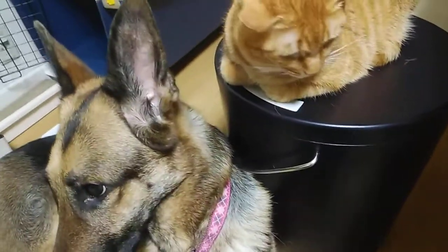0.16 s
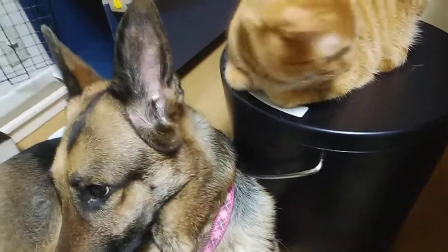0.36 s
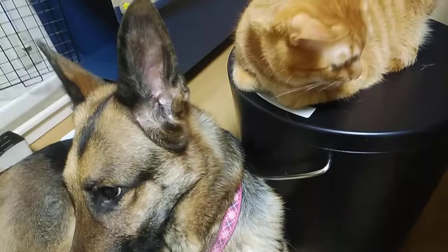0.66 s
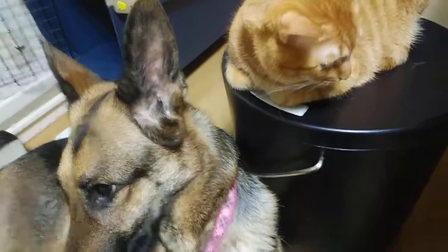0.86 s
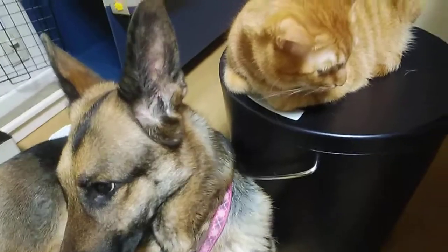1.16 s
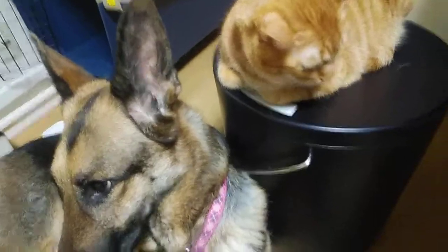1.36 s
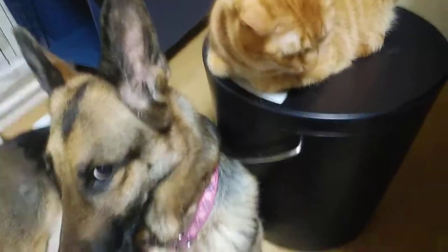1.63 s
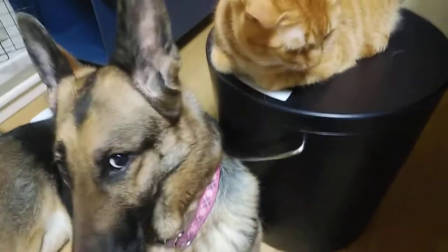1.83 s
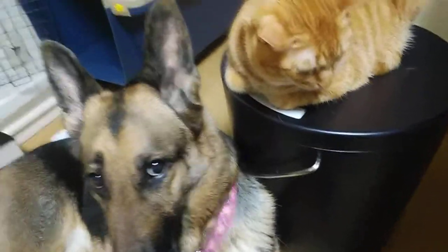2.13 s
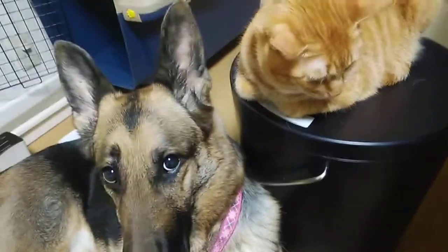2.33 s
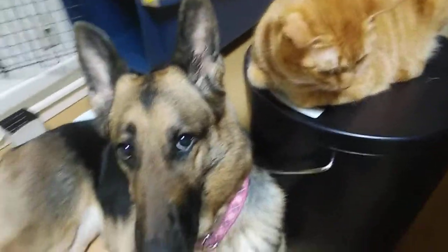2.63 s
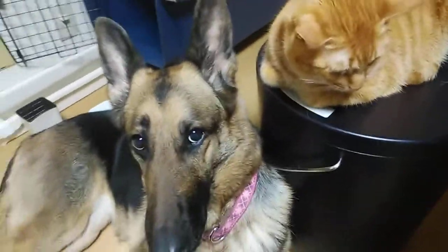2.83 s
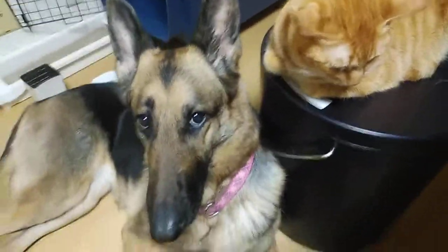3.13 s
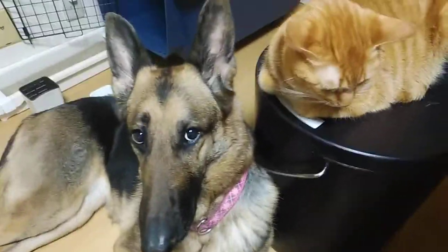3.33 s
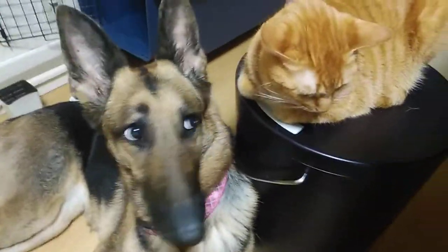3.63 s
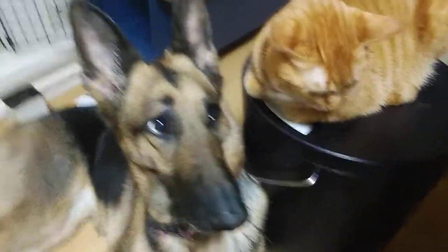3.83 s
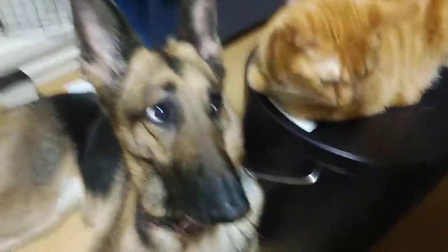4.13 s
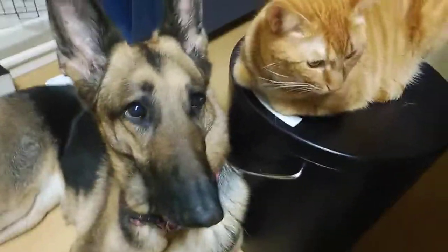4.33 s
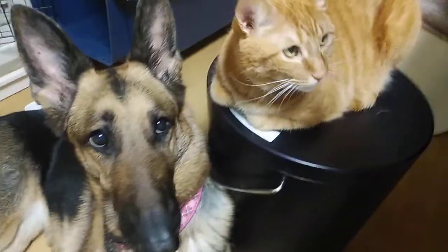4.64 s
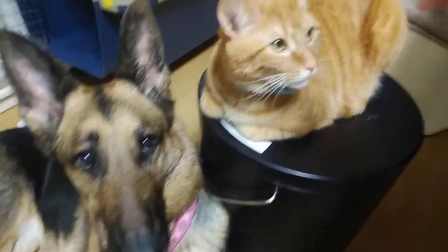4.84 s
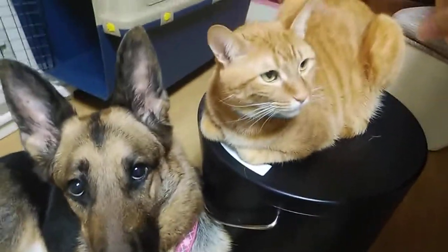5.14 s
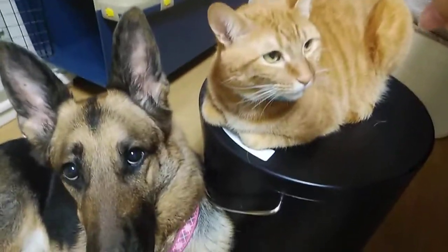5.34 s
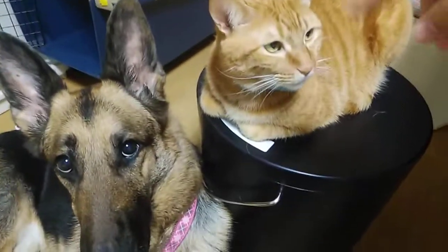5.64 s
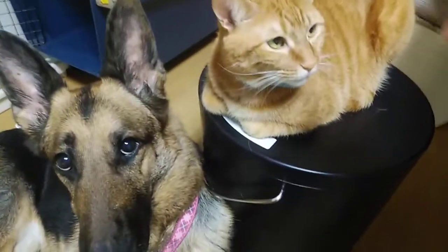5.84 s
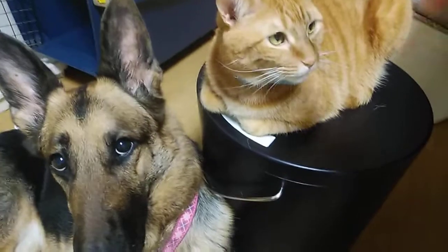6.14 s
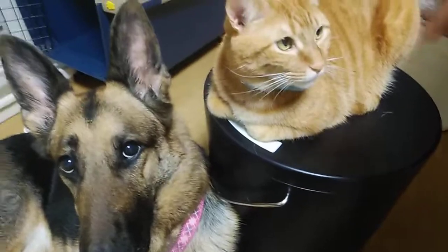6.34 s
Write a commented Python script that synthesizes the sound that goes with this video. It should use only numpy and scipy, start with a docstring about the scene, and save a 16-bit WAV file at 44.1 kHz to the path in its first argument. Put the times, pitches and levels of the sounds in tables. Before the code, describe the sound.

A phone held in a restless hand catches loud finger taps and low rumble throughout the busy opening. Hard, echoing knocks with a hollow ring burst at uneven intervals, with brief rustling and bright ticks between them. After two seconds the knocks stop; handling thumps and short skin slips continue, then thin out. The dog and cat make no sound; quiet room hiss and faint whine continue to a last soft tap.

```python
"""Sharp pops and knocks crack close by in a small hard-walled kitchen: noise bursts with uneven wall echoes
and a struck vessel's modes. Grainy noise rustles and dry ticks lie between them, with brief metal rings.
The microphone is a hand-held phone: fingers tap (snap and bob), slip and rub on its case (coloured noise),
and the hand's tremor rumbles in the bass. A faint room hiss and thin appliance whine lie under all."""
import sys
import numpy as np
from scipy import signal
from scipy.fft import rfft, irfft
from scipy.io import wavfile

SR = 44100
rng = np.random.default_rng(int(sys.argv[2]) if len(sys.argv) > 2 else 0)


def unload_audio(sound):
    """Save the sound as a 16-bit wav file, at the path given as the first command line argument."""
    columns = np.transpose(np.atleast_2d(sound))
    # keep every value between -1 and 1, then stretch to whole-number steps
    steps = np.round(np.clip(columns, -1, 1) * 32767)
    wavfile.write(sys.argv[1], SR, steps.astype(np.int16))


N = 285768

# Pops and knocks in the room: t/s, level of the 1.2-5 kHz noise/dB, body below 1.2 kHz relative to it/dB,
# treble above 5 kHz relative to it/dB, t60/s, first crack relative to the echoes/dB, vessel ring/dB
POP_EVENTS = [(0.2737, -15.5, -19, -7.5, 0.32, -22, 1.5), (0.4444, -35.5, 6, -6.5, 0.94, -15, -11),
              (0.4579, -32, 1, -4, 0.67, -29, -27), (0.5065, -32, 2, -4, 0.25, -16, -12),
              (0.5212, -32.5, 0.5, -24, 0.29, -5, 6), (0.5624, -49, 13.5, -1, 0.21, -1, 0),
              (0.678, -70, -10, 4, 0.3, -5, -9), (0.7192, -46, 2, 1.5, 0.4, -12, -9),
              (0.7391, -39, 0.5, -31, 0.54, -27, -24), (1.0396, -24, 0.5, -7, 0.27, -25, -0.5),
              (1.2349, -44.5, 3.5, -14.5, 0.3, -1, -1), (1.256, -60, -10, -13.5, 0.4, 0, -12),
              (1.3464, -37.5, 9.5, -24, 0.55, -2, -18), (1.3857, -37, 10, -7, 0.22, 4, -9),
              (1.4975, -55.5, -10, 5, 0.11, -10, -11), (1.8418, -23, -8, -7, 0.33, 2.5, -22)]
# Spectrum of a pop: f/Hz, density/dB
POP_SPECTRUM = [(180, -13.5), (350, -1.5), (680, 1), (1060, -10.5), (2000, -3.5), (3200, -15),
                (5600, -26.5), (6900, -23.5), (7700, -12.5), (8600, -20), (10300, -26), (11700, -44.5),
                (13800, -30), (16000, -38)]
# Modes of the struck vessel: f/Hz, level/dB, t60/s
VESSEL_MODES = [(666, -3, .25), (780, 4, .26), (1266, -10, .25), (1361, -8, .25), (1642, -7, .3),
                (1763, 0, .22), (1953, -5, .3), (2015, -2, .3), (2202, -3, .22), (2324, -7, .25),
                (2695, -10, .2), (2879, -12, .2)]
# Rustles and swishes: loudest at t/s, level/dB, treble above 5 kHz relative to it/dB, swell/s, hold/s, fade/s
RUSTLE_EVENTS = [(0.0, -42.5, -6.5, .01, 0.0035, 0.093), (0.351, -34, -4, 0.027, 0.008, .06),
                 (0.573, -36, -2, 0.061, .005, 0.07), (0.766, -43.5, -1.5, 0.039, 0.0056, 0.065),
                 (1.108, -43.5, -7.5, 0.016, 0.016, 0.14), (1.241, -48, -5, 0.0073, .01, 0.41),
                 (1.351, -35.5, -5, .015, 0.025, 0.023), (1.388, -25.5, -10.5, .01, 0.0058, 0.13),
                 (1.673, -50.5, -14, 0.0067, 0.0058, .2), (1.832, -27, -8, .004, 0.015, .03),
                 (1.808, -59, 0, 0.04, 0.0092, .03), (1.944, -48.5, -12, .1, 0.011, 0.15),
                 (2.315, -50.5, -8.5, 0.48, 0.035, 0.14), (2.33, -69, -4, 0.018, 0.028, 0.048),
                 (2.477, -63.5, -1, 0.046, 0.029, .03), (2.586, -42.5, 2.5, 0.041, .07, 0.17),
                 (2.732, -55, -8.5, 0.13, 0.06, 0.069), (3.303, -67, 5, .05, .03, .05),
                 (3.457, -64, -3, .1, 0.036, 0.055), (3.813, -60, 1.5, 0.39, .01, 0.16),
                 (3.978, -62.5, -2, 0.07, .005, 0.21), (4.11, -64, -3, .01, 0.0062, .03),
                 (4.744, -55, -1, 0.046, 0.0045, 0.087), (5.128, -59, -5.5, 0.086, 0.0055, 0.074),
                 (5.533, -70, 3, .03, .02, .15)]
# Spectrum of rustles, shared by the ticks: f/Hz, density/dB
RUSTLE_SPECTRUM = [(600, -18), (1200, -1), (2800, -9), (4250, -17), (6400, -15.5), (7000, -13), (7900, -4),
                   (8800, -13), (10200, -12.5), (11700, -26.5), (14200, -18), (16000, -32.5)]
# Dry ticks: t/s, peak level/dB, tilt about 5 kHz/(dB per octave)
TICK_EVENTS = [(0.285, -29, 6), (0.315, -18, -4), (0.458, -12.5, 10.5), (0.508, -17, 6), (0.522, -18, -5),
               (0.875, -44, 9), (0.979, -41, 10), (1.041, -9, -17), (1.386, -19.5, 7), (1.674, -28, -6),
               (1.688, -38, 6), (1.843, -14, 7), (2.072, -39, 6), (3.135, -42, 2), (3.180, -39.5, 4),
               (3.815, -28, -15), (3.976, -31.5, -14), (4.102, -31, -18), (5.54, -52.5, 9),
               (5.847, -32, 21), (6.445, -33, -10)]
# Touches of a small metal part: t/s, level/dB, tilt about 8 kHz/(dB per kHz)
CLINK_EVENTS = [(0.458, -46, 7.5), (0.563, -45, 11), (1.42, -57, -1), (1.45, -46, -4.5), (1.50, -55, 10.5),
                (1.555, -47.5, 1), (1.86, -44, -1), (1.94, -55, -3)]
# Modes of the metal part: f/Hz, level/dB, t60/s
METAL_MODES = [(6547, -5, 0.28), (8150, -16, .5), (10050, -8, 0.057), (8800, -15, .05), (10370, -15, 0.067)]
# Finger taps on the case: t/s, press 1 or release -1, snap level/dB, snap f/Hz, bob level/dB, bob f/Hz
TAP_EVENTS = [(0.0469, -1, -3.5, 248, -10.5, 123), (0.107, 1, -10.5, 218, -19, 110),
              (0.2220, 1, -2.5, 288, -12, 87), (0.326, 1, -3, 245, -43, 120),
              (0.4241, 1, -4.5, 308, -36, 128), (0.455, 1, -6.5, 188, -42, 124),
              (0.6450, 1, -19, 285, -45, 65), (0.825, 1, -21, 222, -16, 70), (0.8823, 1, -16, 255, -18, 60),
              (1.158, 1, -12, 158, -13, 75), (1.2135, 1, -18, 298, -34, 110),
              (1.261, 1, -19, 170, -25, 140), (1.3099, 1, -6.5, 165, -15, 103),
              (1.384, 1, -25, 247, 0, 260), (1.526, 1, -3, 159, -9.5, 115), (1.675, -1, -7, 440, 7, 61.5),
              (1.783, 1, -35, 250, -8, 85), (1.843, 1, -21, 250, 1.5, 131), (2.302, 1, -27, 260, -34, 111),
              (2.416, 1, -27, 202, 7, 51.5), (2.546, 1, -24, 240, -39, 110),
              (2.6698, -1, -8.5, 195, -1, 143), (2.7243, -1, -0.6, 274, -18, 112),
              (2.7939, -1, -0.5, 327, -1.5, 55.4), (2.9546, -1, 2, 343, -11, 74.5),
              (3.0550, -1, -2.5, 372, -12, 67), (3.134, -1, -14.5, 410, 1.5, 77.4),
              (3.281, 1, -13.5, 214, -10, 88), (3.8166, 1, -8.5, 172, 2, 74),
              (3.976, 1, -41, 605, -48, 44.7), (4.1020, 1, -7.5, 176, 0.8, 88.5),
              (6.4464, 1, -9, 182, 3.5, 73)]
# Skin slipping on the case: start t/s, length/s, level/dB, top of its noise f/Hz
SLIP_EVENTS = [(0.052, 0.008, -23.5, 646), (1.148, 0.044, -26, 900), (1.345, 0.078, -18.5, 470),
               (1.7, 0.062, -19, 460), (1.752, 0.11, -24.5, 344), (1.834, .09, -23.5, 428),
               (2.136, 0.06, -50, 910), (2.18, 0.27, -39, 1350), (2.713, 0.039, -24, 733),
               (2.804, 0.028, -23, 890), (2.961, 0.054, -25, 1020), (3.06, 0.035, -25, 1070),
               (3.139, 0.019, -24, 870), (3.17, 0.025, -29, 1110)]
# Tremor of the hand over time: t/s, rumble level/dB
TREMOR_LEVEL = [(0, -24), (.1, -33.5), (.25, -26), (.63, -32), (.8, -28.5), (1.08, -33), (1.25, -28.5),
                (1.67, -25), (1.71, -14.5), (1.84, -12.5), (1.96, -22), (2.3, -26.5), (3.1, -20),
                (3.3, -23.5), (3.9, -31), (4.3, -24), (4.75, -23.5), (5.35, -30), (5.7, -26.5), (6.48, -30)]
# Spectrum of the tremor: f/Hz, density/dB
RUMBLE_SPECTRUM = [(8.8, -44.5), (15, -15.5), (32, -2), (59, 1.5), (79, -5), (110, -13), (156, -18),
                   (205, -38), (250, -35.5), (320, -65.5), (550, -120)]
# Fingers rubbing the case: strongest at t/s, level/dB, swell/s, hold/s, fade/s
RUB_EVENTS = [(0.0, -30.5, .01, .005, 0.1), (0.312, -32, 0.066, 0.15, 0.19), (0.788, -36, 0.17, .005, 0.06),
              (1.22, -34, 0.17, 0.3, 0.083), (1.888, -18, 0.15, 0.003, 0.13),
              (2.21, -34.5, 1, 0.0036, 0.61), (3.073, -29, 0.25, 0.0044, 0.094)]
# Spectrum of the rubbing: f/Hz, density/dB
RUB_SPECTRUM = [(59, -22), (100, 1), (119, -4), (368, -19.5), (517, -23.5), (1080, -33.5), (1500, -40),
                (1950, -55.5), (3300, -120)]
# Spectrum of the room hiss: f/Hz, density/dB
ROOM_SPECTRUM = [(120, -34.5), (250, 5), (450, -13), (650, -6.5), (1000, -13.5), (2600, -22.5),
                 (3300, -25.5), (4200, -28), (6300, -35.5), (7800, -27), (8800, -33.5), (11800, -41),
                 (14200, -37), (16000, -50.5)]
# Faint appliance whine: f/Hz, rms level/dB
WHINE_LINES = [(2972, -86), (3127, -83), (3280, -82), (3346, -83), (3896, -88), (4700, -91), (7530, -87),
               (9447, -91), (11360, -93), (15127, -93)]


def pops(echo_db=4, spike_db=3, crack_s=0.0023):
    """A hard first crack, then dense uneven wall echoes that die away; a short blow drives the vessel's modes."""
    out = np.zeros(N)
    t = np.arange(SR // 2) / SR
    for s, db, body_db, treble_db, t60, crack_db, ring_db in POP_EVENTS:
        patches = echo_db * np.repeat(rng.standard_normal(len(t) // 50), 50)
        spikes = spike_db * np.minimum(rng.exponential(1, len(t)), 4)
        unevenness_db = (patches + spikes) * np.exp(-t / 0.085)  # echoes merge as they multiply
        decay = amp(-60 * t / max(t60, .02))
        crack = 1 + amp(crack_db) * np.exp(-t / crack_s)
        echoes = rng.standard_normal(len(t)) * amp(unevenness_db) * decay * crack

        burst = colour(echoes, POP_SPECTRUM)
        parts = [band(burst, "low", 1200), band(burst, "band", [1200, 5000]), band(burst, "high", 5000)]
        # each band is levelled over samples 200 to 1500, just after the onset
        body, middle, treble = [p / np.std(p[200:1500]) for p in parts]

        blow = echoes * np.exp(-t / 0.0017) / np.linalg.norm(echoes[:100])
        vessel = np.zeros(len(t))
        for hz, mode_db, mode_t60 in VESSEL_MODES:
            low_db = body_db if hz < 1200 else 0  # low modes follow the body
            vessel += amp(mode_db + ring_db + low_db) * ring(blow, hz, mode_t60)
        add(out, s, amp(db) * (middle + vessel + amp(body_db) * body + amp(treble_db) * treble))
    return out


def rustle(grain_db=2.0, flutter_db=2.0):
    """Movement sheds dense soft grains, in two bands that swell and fade together."""
    grain_level_db = grain_db * rng.exponential(1, N) + flutter_db * drift(45)
    grains = colour(rng.standard_normal(N) * amp(grain_level_db), RUSTLE_SPECTRUM)
    middle = rms_one(band(grains, "band", [1200, 3500]))
    treble = rms_one(band(grains, "high", 5000))
    out = np.zeros(N)
    for s, db, treble_db, *shape in RUSTLE_EVENTS:
        out += amp(db) * swell(s, *shape) * (middle + amp(treble_db) * treble)
    return out


def ticks():
    """Single dry clicks: noise that decays in a fraction of a millisecond, tilted dull or bright."""
    out = np.zeros(N)
    for s, db, tilt_db in TICK_EVENTS:
        click = rng.standard_normal(600) * np.exp(-np.arange(600) / 12.0)
        tilted = colour(click, [(600, -3 * tilt_db), (20000, 2 * tilt_db)])
        click = colour(tilted, RUSTLE_SPECTRUM)
        add(out, s, amp(db) * click / np.max(np.abs(click)))
    return out


def clinks():
    """Each touch sets the thin metal modes ringing; the ring wavers as the part swings."""
    s, level_db, tilt_db = np.transpose(CLINK_EVENTS)
    at = np.round(s * SR).astype(int)
    out = np.zeros(N)
    for hz, mode_db, t60 in METAL_MODES:
        touch = np.zeros(N)
        touch[at] = amp(level_db + mode_db + tilt_db * (hz / 1000 - 8))
        out += ring(touch, hz, t60) * amp(2.8 * drift(28.0))
    return out


def taps(press_fade_db=14, release_fade_db=24, cycles=1.62):
    """The case snaps abruptly, opposite in sign and quicker to fade on release; the phone then bobs.

    Fades are in dB per snap cycle; the bob is down 20 dB after the given cycles."""
    out = np.zeros(N)
    t = np.arange(SR // 6) / SR
    for s, press, snap_db, snap_hz, bob_db, bob_hz in TAP_EVENTS:
        phase = snap_hz * t
        fade_db = press_fade_db if press > 0 else release_fade_db
        snap = np.sign(press) * np.sin(2 * np.pi * phase ** 0.82)  # its pitch sinks
        snap *= amp(-fade_db * phase) * np.minimum(t / 0.00053, 1)
        turns = bob_hz * t
        bob = np.sin(2 * np.pi * turns) * (1 - np.exp(-turns / .5))
        bob *= amp(-20 * (turns / cycles) ** 1.88)
        add(out, s, amp(snap_db) * band(snap, "low", 3.43 * snap_hz) + amp(bob_db) * bob)
    return out


def slips(start_s=.004, end_s=.012, rattle_db=3):
    """Short rough, rattling bursts of stick-slip, dull because they travel through the case."""
    out = np.zeros(N)
    t = np.arange(SR // 4) / SR
    for s, length, db, top_hz in SLIP_EVENTS:
        rattle = amp(rattle_db * np.repeat(rng.standard_normal(len(t) // 175), 175))  # 4 ms steps
        skin = [(60, -15), (170, 0), (top_hz, -17), (1.06 * top_hz, -32), (5.2 * top_hz, -60), (12000, -110)]
        rough = colour(rng.standard_normal(len(t)) * rattle, skin)
        attack = t / start_s
        release = (length + end_s - t) / (end_s + 0.43 * length)
        add(out, s, amp(db) * rough * np.clip(np.minimum(attack, release), 0, 1))
    return out


def grip(lump_db=2.5, scratch_db=2.5, resting_rub_db=-45.5):
    """Lumpy hand tremor in the deep bass; skin sticking and slipping on the case above it."""
    tremor_s, tremor_db = np.transpose(TREMOR_LEVEL)
    tremor_gain = amp(np.interp(np.arange(N) / SR, tremor_s, tremor_db))
    strokes = amp(resting_rub_db)  # fingers lying still
    for s, db, *shape in RUB_EVENTS:
        strokes = strokes + amp(db) * swell(s, *shape)
    tremor = rms_one(colour(rng.standard_normal(N) * amp(lump_db * drift(22)), RUMBLE_SPECTRUM))
    rub = rms_one(colour(rng.standard_normal(N) * amp(scratch_db * drift(50)), RUB_SPECTRUM))
    return tremor_gain * tremor + strokes * rub


def room(hiss_db=-50.5):
    """Steady coloured-noise hiss of the room and thin sine lines from a running appliance."""
    t = np.arange(N) / SR
    whine = sum(np.sqrt(2) * amp(db) * np.sin(2 * np.pi * hz * t) for hz, db in WHINE_LINES)
    hiss = rms_one(colour(rng.standard_normal(N), ROOM_SPECTRUM))
    return amp(hiss_db) * hiss + whine


def amp(db):
    """Amplitude factor of a level in dB."""
    return 10 ** (np.asarray(db) / 20)


def rms_one(x):
    """Scale to an rms of 1."""
    return x / np.sqrt(np.mean(x ** 2) + 1e-20)


def colour(x, spectrum):
    """Causal (minimum-phase) filter of unit energy that follows a spectrum."""
    hz = np.maximum(np.arange(4097) * SR / 8192, 5)
    points_hz, points_db = np.transpose(spectrum)
    gain_db = np.interp(np.log(hz), np.log(points_hz), points_db)
    # folding the cepstrum onto positive times gives minimum phase
    cepstrum = irfft(np.log(amp(gain_db)))
    cepstrum[1:4096] *= 2
    cepstrum[4097:] = 0
    response = irfft(np.exp(rfft(cepstrum)))
    return signal.fftconvolve(x, response / np.linalg.norm(response))[:len(x)]


def band(x, kind, hz):
    """Third-order Butterworth filter."""
    return signal.sosfilt(signal.butter(3, hz, kind, fs=SR, output="sos"), x)


def drift(rate):
    """Slow chance: straight lines between random knots of spread 1, rate in knots per second."""
    knots = rng.standard_normal(int(N / SR * 60) + 2)
    return np.interp(np.arange(N) / SR * min(rate, 59), np.arange(len(knots)), knots)


def ring(clicks, hz, t60):
    """A resonator: a unit click sets a decaying sine of starting height 1 ringing."""
    r = amp(-60 / (t60 * SR))
    w = 2 * np.pi * hz / SR
    return signal.lfilter([0, np.sin(w)], [1, -2 * r * np.cos(w), r * r], clicks + 1e-18)


def swell(s, rise, hold, fade):
    """Gain that climbs 20 dB per rise time, holds at 1, then drops 20 dB per fade time."""
    t = np.arange(N) / SR - s
    rising = t / max(rise, .002)
    falling = (hold - t) / max(fade, .002)
    return amp(20 * np.minimum(np.minimum(rising, falling), 0))


def add(out, s, sound):
    """Mix a sound in at time s, cut at the end."""
    at = round(s * SR)
    out[at:at + len(sound)] += sound[:N - at]


def scene():
    """All layers in one channel."""
    return (pops() + rustle() + ticks() + clinks() + taps() + slips() + grip() + room())[None]


def record(dry, shelf_hz=15750, cutoff_hz=16800):
    """The bass is trimmed, peaks are rounded, the treble steps down and is then cut; a brief fade closes."""
    x = band(band(dry, "high", 36), "high", 28)
    x = x / (1 + (np.abs(x) / .7) ** 8) ** (1 / 8)  # peaks bend towards 0.7
    x = signal.sosfilt(signal.ellip(8, .5, 18, shelf_hz, fs=SR, output="sos"), x)
    x = x * np.minimum(np.arange(N)[::-1] / SR / .004, 1)
    return signal.sosfilt(signal.cheby2(12, 60, cutoff_hz, fs=SR, output="sos"), x)


dry = scene()
out = record(dry)
unload_audio(out)
```